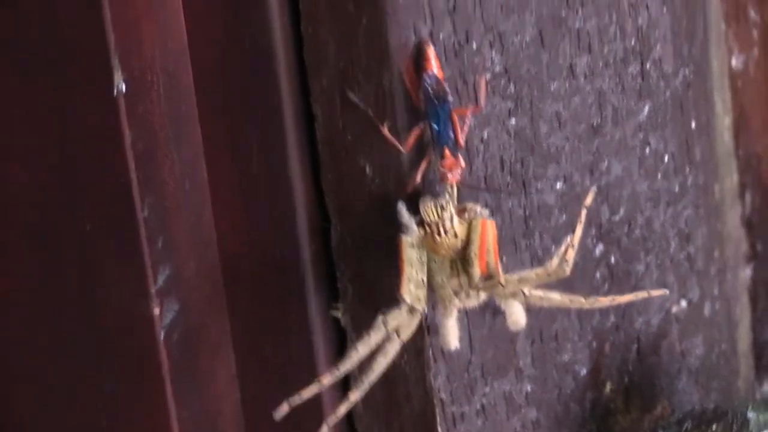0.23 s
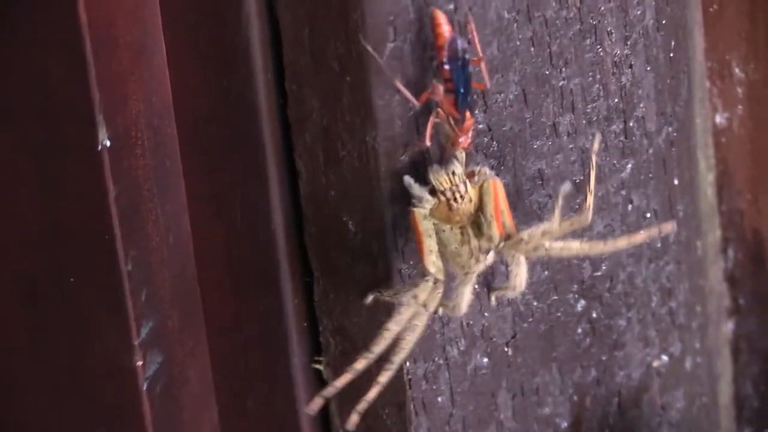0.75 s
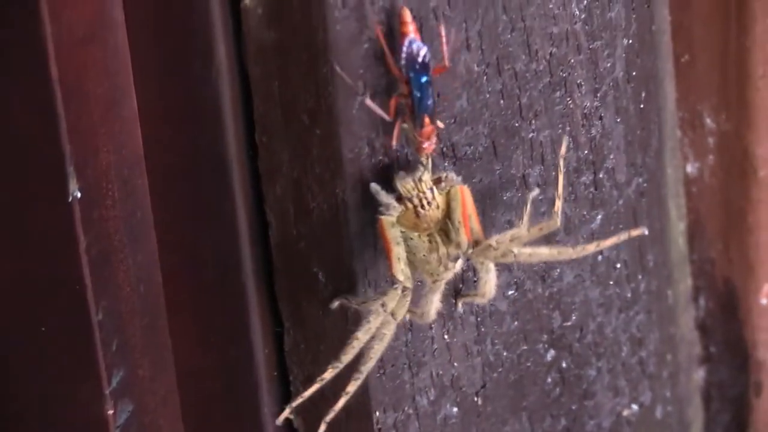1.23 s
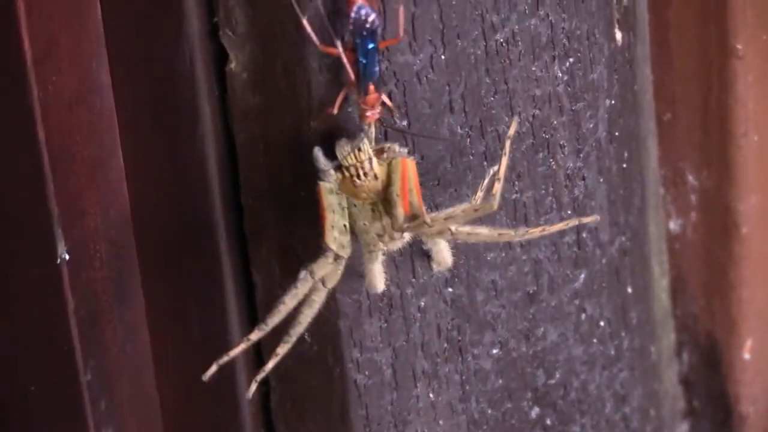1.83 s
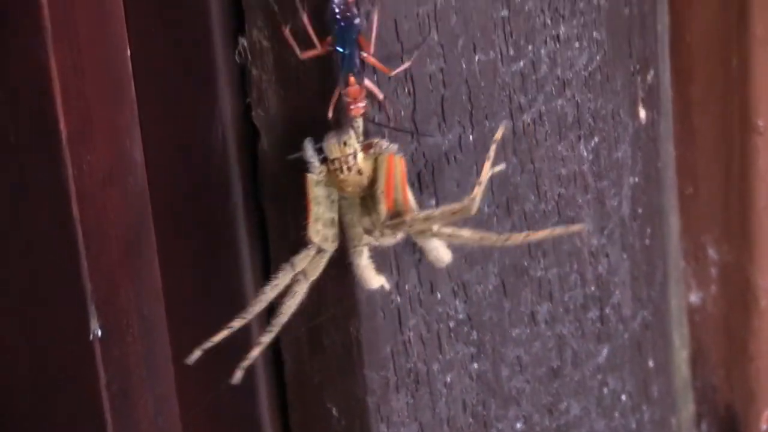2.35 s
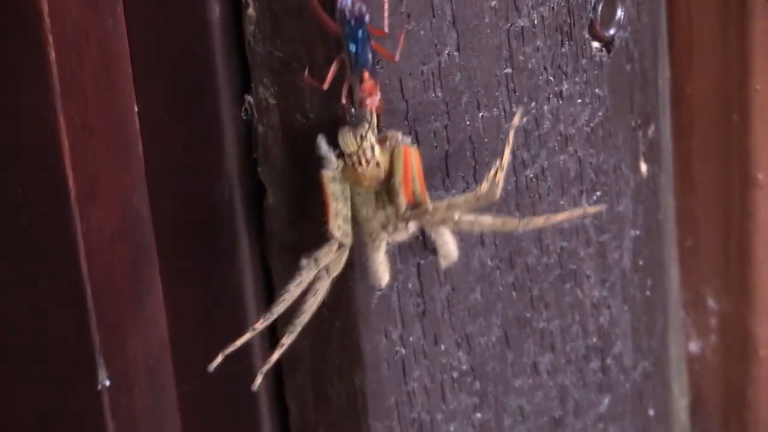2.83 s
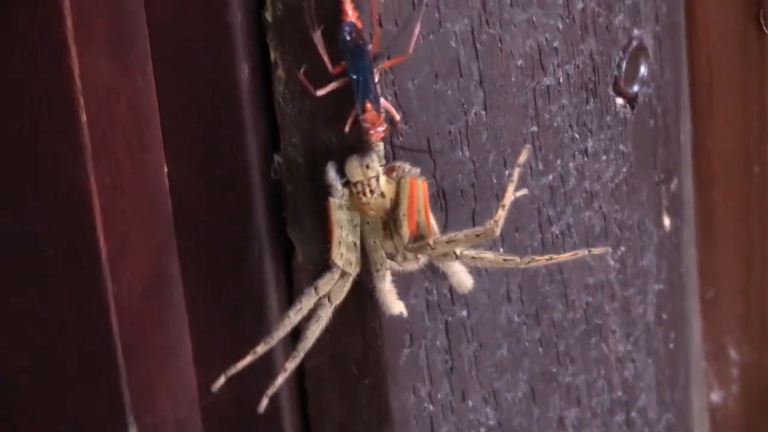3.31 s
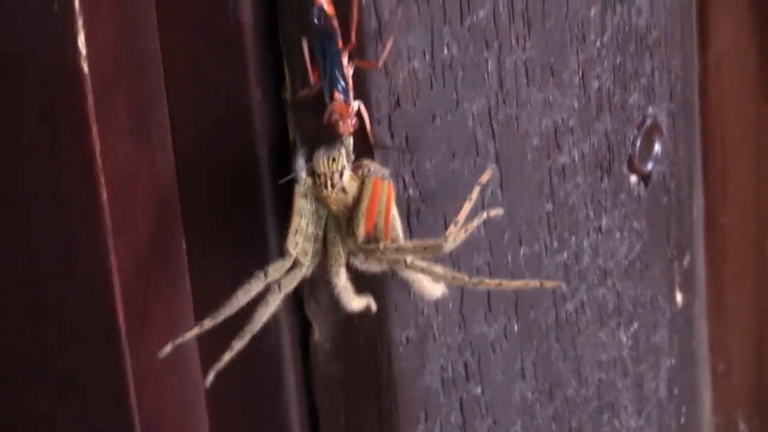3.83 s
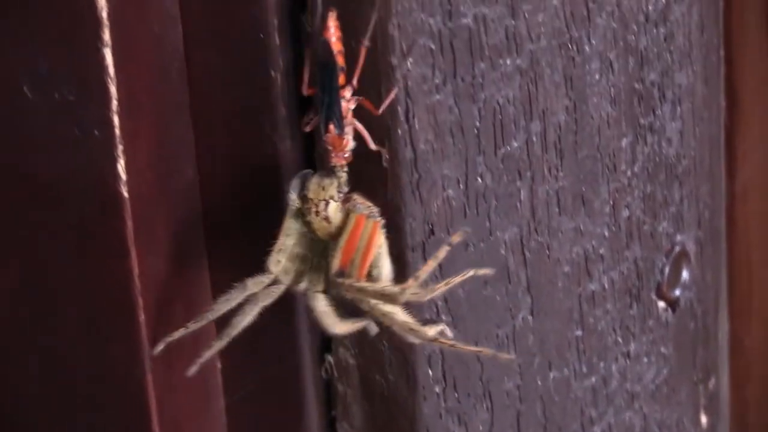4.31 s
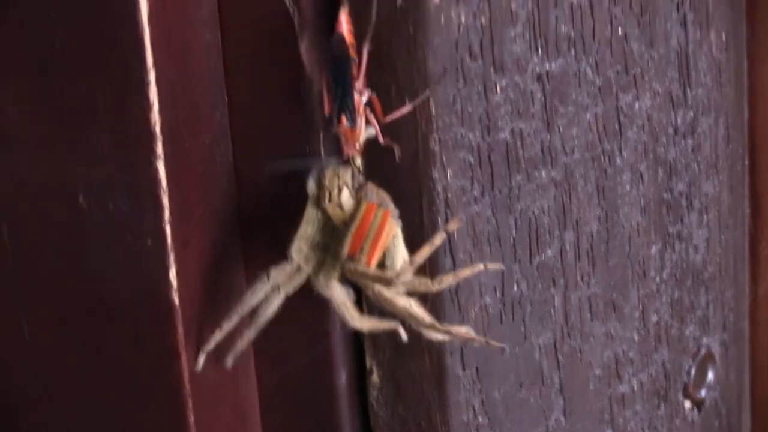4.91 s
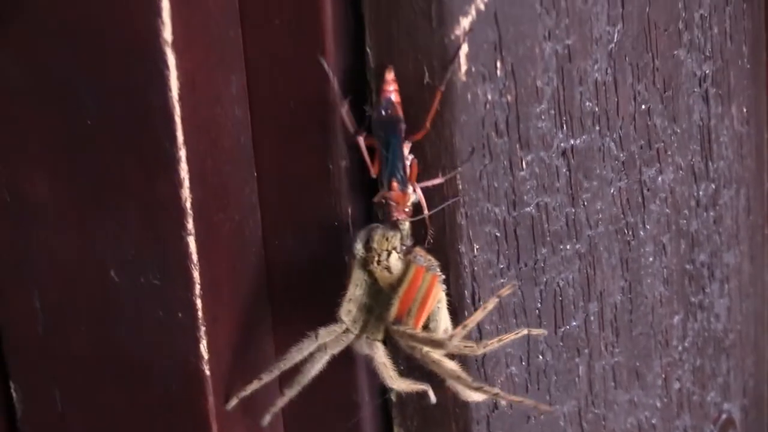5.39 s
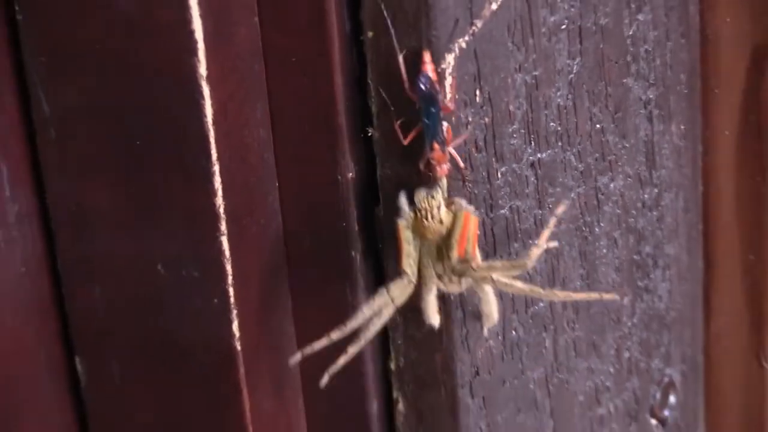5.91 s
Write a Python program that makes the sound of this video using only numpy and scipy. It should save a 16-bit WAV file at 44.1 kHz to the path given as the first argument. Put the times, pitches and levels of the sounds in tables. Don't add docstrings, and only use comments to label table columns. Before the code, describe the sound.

Humid forest ambience with shrill cricket trills, raspy bird calls, warbling whistles and quick chirps over a low distant engine throb and leaf hiss.

```python
import sys
import numpy as np
from scipy import signal
from scipy.io import wavfile
from scipy.ndimage import uniform_filter1d

SR = 44100
rng = np.random.default_rng(int(sys.argv[2]) if len(sys.argv) > 2 else 0)


def convert_level_to_amplitude(level_db):
    exponent = np.asarray(level_db, float) / 20
    return 10 ** exponent


def dump_mix(stems):
    frames = np.atleast_2d(stems).T
    limited = np.clip(frames, -1, 1)
    pcm = np.round(limited * 32767).astype(np.int16)
    wavfile.write(sys.argv[1], SR, pcm)


N = 271435


def evened(x):
    return x / np.sqrt(np.mean(x ** 2) + 1e-20)


def read(points, hz):
    point_hz, value = np.transpose(points)
    return np.interp(np.log(hz + 1), np.log(point_hz + 1), value)


def curves(rows, t):
    s, *columns = np.transpose(rows)
    return [np.interp(t, s, column) for column in columns]


def add(mix, s, sound):
    part = mix[round(s * SR):][:len(sound)]
    part += sound[:len(part)]


def resonate(x, hz, width):
    turn = np.exp(2j * np.pi * hz * np.arange(x.shape[-1]) / SR)
    r = np.exp(-np.pi * width / SR)
    return 2 * (turn * signal.lfilter([1 - r], [1, -r], x / turn)).real


def wander(hz, size=N):
    lowpass = signal.butter(2, hz, fs=SR, output="sos")
    return evened(signal.sosfilt(lowpass, rng.standard_normal(size + SR))[SR:])


def placed(x, side_db):
    return np.array([x * convert_level_to_amplitude(side_db / 2), x * convert_level_to_amplitude(-side_db / 2)])


# frequency in Hz, density in dB per Hz.
AIR = [(18, -57), (30, -52), (59, -23), (192, -3.5), (350, -15.5), (1140, -19.5), (2300, -23.5),
       (3690, -29.5), (5600, -30.5), (6550, -26.5), (7280, -16), (8290, -26), (8970, -37), (14000, -45.5),
       (15500, -43)]
# frequency in Hz, left-right likeness from -1 to 1.
SAME = [(60, 0.8), (150, 1), (380, 0.25), (950, -0.32), (2400, 0.5), (6000, -0.32), (9000, 0.79),
        (12000, 0.58), (15000, 0.32)]


def air():
    frames, hz = N // 256 + 5, np.fft.rfftfreq(1024, 1 / SR)
    a, b, c, d, patches = rng.standard_normal((frames, 513, 5)).T
    patches = evened(uniform_filter1d(uniform_filter1d(patches, 8, 0), 16, 1))
    same = np.clip(read(SAME, hz), -1, 1)[:, None]
    left, independent = a + 1j * b, c + 1j * d
    z = np.array([left, same * left + np.sqrt(1 - same ** 2) * independent])
    z *= convert_level_to_amplitude(read(AIR, hz)[:, None] + 1.4 * patches)
    noise = signal.istft(z, nperseg=1024, noverlap=768)[1][:, :N]
    return convert_level_to_amplitude(-51.5) * evened(noise)


# time in seconds, firing rate in Hz, level in dB.
ENGINE = [(0, 32.4, -49.5), (.15, 31.8, -51.5), (.55, 31.32, -49.5), (1.05, 29.98, -51.5),
          (1.5, 30.06, -53.5), (2, 29.27, -56), (2.3, 28.94, -52.5), (2.6, 28.33, -51.5), (3.1, 28.61, -46),
          (3.6, 28.89, -51), (4, 28.93, -47), (4.5, 29.58, -47), (5, 30.13, -46), (5.2, 30.25, -43),
          (5.35, 30.55, -43.5), (5.7, 30.77, -45.5), (6.15, 31.08, -44)]
# multiple of the firing rate, level in dB.
EXHAUST = [
    [(1, -60), (2, -38), (3, -9), (4, -2.5), (5, 0), (6, -1.5), (7, -17), (8, -17), (9, -28), (10, -24),
     (11, -23), (12, -28)],
    [(1, -60), (2, -35), (3, -6), (4, 1), (5, 1.5), (6, -1), (7, -5), (8, -9.5), (9, -23), (10, -32),
     (11, -25), (12, -36)],
    [(1, -60), (2, -39), (3, -29), (4, -16), (5, -11), (6, -1), (7, 0.5), (8, -20), (9, -14.5), (10, -18),
     (11, -38), (12, -39)],
    [(1, -60), (2, -39), (3, -27), (4, -15.5), (5, -6), (6, 1.5), (7, -3.5), (8, -24), (9, -17), (10, -8.5),
     (11, -25), (12, -37)],
    [(1, -60), (2, -42), (3, -24), (4, -19), (5, 0.5), (6, 0), (7, -7.5), (8, -10.5), (9, -15), (10, -12),
     (11, -18.5), (12, -19)],
]
EXHAUST_AT = [.55, 1.65, 3, 4.4, 5.7]


def engine(t):
    hz, db = curves(ENGINE, t)
    turns = np.cumsum(hz * (1 + .004 * wander(6.0))) / SR
    orders = np.zeros(N)
    for order in np.transpose(EXHAUST, (1, 0, 2))[:11]:
        multiple = order[0, 0]
        level_db = np.interp(t, EXHAUST_AT, order[:, 1]) + 2.0 * wander(2.8)
        smear = 0.2148 * multiple ** 2
        orders += convert_level_to_amplitude(level_db) * np.cos(2 * np.pi * multiple * turns + smear)
    orders /= np.sqrt(uniform_filter1d(orders ** 2, SR // 2))
    noise = rng.standard_normal(N)
    rumble = evened(resonate(resonate(noise, 140, 120), 195, 130))
    return convert_level_to_amplitude(db) * evened(orders + convert_level_to_amplitude(-14) * rumble)


def strokes(u):
    stroke_s, sounding_share = .014, .95
    part = (u % stroke_s) / (stroke_s * sounding_share)
    return np.sin(np.pi * np.clip(part, 0, 1)) * (u >= 0) * (u < 3 * stroke_s)


# centre in Hz, spread in Hz, number of singers.
CHOIRS = [
    (7240, 105, 45),
    (7620, 5, 2),
    (7830, 10, 3),
    (7750, 300, 20),
]
CHOIR_DB = [-55.3, -64.5, -67, -65.5]


def choirs(t):
    out = np.zeros((2, N))
    for (hz, spread, singers), db in zip(CHOIRS, CHOIR_DB):
        choir = np.zeros((2, N))
        for tune, pace, start, side, far in np.clip(rng.standard_normal((int(singers), 5)), -2, 2):
            u = (t + 3 + start) % (.1 * (1 + .12 * pace))
            song = strokes(u) * np.cos(2 * np.pi * (hz + spread * tune) * t)
            choir += convert_level_to_amplitude(3.0 * far) * placed(song, 6.0 * side)
        out += convert_level_to_amplitude(db) * evened(choir)
    return out


# start in seconds, length in seconds, effort in dB, beak opening 0-1.
RASPS = [(-.3, 0.33, -43, 0.9), (0.081, 0.089, -46.5, 0.9), (0.25, 0.16, -50.5, 0.8),
         (0.615, 0.11, -55, .1), (0.798, 0.23, -59, 0), (1.055, 0.098, -52.5, 0), (1.233, 0.36, -60, 0),
         (1.507, 0.31, -46.5, 0.56), (1.6, 0.28, -47, 0.79), (1.85, 0.13, -46, .45),
         (2.138, 0.14, -51, 0.4), (2.22, 0.14, -51, 0.76), (2.77, 0.34, -61, 0.15),
         (3.494, 0.29, -46.5, 0.91), (3.75, 0.28, -51, 0.88), (4.02, 0.38, -54.5, 0.67),
         (4.562, 0.62, -48, 0.59), (5.462, 0.16, -53, 0.07), (5.674, 0.17, -51, 0)]
# dB shut, dB open, lag in seconds,
# sag in dB over a call.
RASP_PARTS = [(1.5, -7, 0.0024, -6.5), (-1.5, 1, 0.001, -6), (-22.5, 1.5, 0.052, -5.5)]


def rasp_gains(t):
    s, length, db, opening = np.transpose(RASPS)[..., None]
    rise_s, fall_s = 0.015, 0.049
    gains = []
    for shut_db, open_db, lag, sag_db in RASP_PARTS:
        rise = np.clip((t - s - abs(lag)) / (rise_s + .4 * abs(lag)), 0, 1) ** 2
        fall = np.exp(-np.maximum(t - s - length, 0) / fall_s)
        sag = sag_db * np.clip((t - s) / length, 0, 1)
        gains.append(rise * fall * convert_level_to_amplitude(db + shut_db + (open_db - shut_db) * opening + sag))
    return gains


# start in seconds, length in seconds, level in dB.
CROAKS = [(-.1, 0.91, -54.5), (.58, 0.23, -53.5), (1.0, 0.74, -59.5), (1.45, 0.57, -57.5),
          (2.034, 0.43, -53), (3.455, 0.73, -51.5), (3.95, .65, -56), (4.5, .2, -55.5),
          (4.647, 0.76, -58.5), (5.452, 0.31, -52.5), (5.67, 0.24, -48.5), (5.851, 0.38, -57)]


def croak_gain(t):
    s, length, db = np.transpose(CROAKS)[..., None]
    return convert_level_to_amplitude(db) * abs(np.sin(np.pi * np.clip((t - s) / length, 0, 1))) ** 0.69


# frequency in Hz, width in Hz, level in dB.
LOWER = [(2850, 600, 0), (3250, 800, 0)]
MIDDLE = [(3550, 250, -5), (3850, 350, -1), (4150, 900, -2), (4500, 300, -1), (4750, 350, -4)]
UPPER = [(5000, 350, -2), (5350, 350, -2), (5400, 1100, -2)]
CHEST = [(542, 450, -4), (1020, 340, -3), (1647, 330, -1.5)]


def rasps(t):
    turns = np.cumsum(135 * (1 + 0.15 * wander(30.0))) / SR
    gate = 1.0 + np.exp(-(turns % 1) / 1.9)
    coarse = t[::32]
    murmur_db = -71.5
    out = np.zeros(N)
    for throat, gains in zip((LOWER, MIDDLE, UPPER, CHEST), rasp_gains(coarse) + [croak_gain(coarse)]):
        level_db = 10 * np.log10((gains ** 2).sum(0) + convert_level_to_amplitude(murmur_db) ** 2)
        level_db = np.repeat(level_db, 32)[:N]
        shaped = np.zeros(N)
        for hz, width, db in throat:
            breath = gate * rng.standard_normal(N)
            voiced = evened(resonate(resonate(breath, hz, width), hz, width))
            shaped += convert_level_to_amplitude(db + 2.0 * wander(10.6)) * voiced
        out += convert_level_to_amplitude(level_db + 1.4 * wander(17.3)) * evened(shaped)
    return out


def note(rows, overtones, warble=0., loudest=0., shake=0.012, grain_db=2.0, edge_s=0.00089, grain_hz=60):
    t = np.arange(rows[0][0], rows[-1][0], 1 / SR)
    hz, db = curves(rows, t)
    warble_hz, depth, lead = 17.5, .03, 1.1
    beat = 2 * np.pi * warble_hz * (t - loudest) + .5 * wander(8.8, len(t))
    fall = np.cos(beat + lead) + 0.13 * np.cos(2 * beat + lead)
    bend = depth * warble * fall + shake * wander(165, len(t))
    turns = np.cumsum(hz * (1 + bend)) / SR
    tone = sum(convert_level_to_amplitude(k_db) * np.cos(2 * np.pi * k * turns) for k, k_db in overtones)
    grain = convert_level_to_amplitude(grain_db * wander(grain_hz, len(t)))
    edge = np.clip(np.minimum(t - t[0], t[-1] - t) / edge_s, 0, 1)
    pulse = 1 + .5 * np.cos(beat) * np.sqrt(abs(warble))
    return t[0], np.sqrt(2) * convert_level_to_amplitude(db) * pulse * grain * edge * tone


def whistle(s, length, hz, db, swell):
    end, drop_s, sag_db = s + length, 0.069, -1.5
    return [(s, hz * (1 - 0.0199), db - 12.5),
            (s + swell, hz, db),
            (end - min(drop_s, length / 2), hz, db + sag_db),
            (end, hz * (1 - 0.0706), db + sag_db - 8.5)]


# start in seconds, length in seconds, pitch in Hz, level in dB, swell in seconds.
WHISTLES = [
    (0, 0.055, 1320, -50, 0.0017),
    (.11, 0.59, 1338, -51, 0.096),
    (1.298, .52, 1312, -53.5, 0.379),
    (1.885, 0.55, 1328, -50, 0.05),
]
# depth 0-1, loudest moment in seconds.
WARBLES = [(.2, .02), (.65, .39), (.25, 1.77), (.9, 2.197)]


def whistler():
    out = np.zeros(N)
    for row, warble in zip(WHISTLES, WARBLES):
        add(out, *note(whistle(*row), [(1, 0)], *warble, shake=.008, grain_db=3.5, grain_hz=35))
    return out


def cricket(bouts, every_s, hz):
    out, u = np.zeros(N), np.arange(0, .05, 1 / SR)
    for start, chirps, db in bouts:
        for k in range(round(chirps)):
            bend, turn, push = rng.random(3)
            wing = np.cos(2 * np.pi * (hz * (1 + .004 * (bend - .5)) * u + turn))
            level_db = db + 4.0 - 2 * (push - 1.0)
            add(out, max(start + k * every_s - .0015, 0), convert_level_to_amplitude(level_db) * strokes(u) * wing)
    return out


# start in seconds, number of chirps, level in dB.
NEIGHBOUR = [
    (0, 1, -55.5),
    (.09, 2, -53),
    (.283, 1, -56),
    (.452, 2, -55.5),
    (.646, 1, -54),
    (.777, 3, -55),
    (1.095, 1, -56),
    (1.283, 6, -58),
    (2.197, 3, -59),
    (2.605, 3, -67),
]


def neighbour_cricket():
    return cricket(NEIGHBOUR, .105, 8230)


# start in seconds, number of chirps, level in dB.
CRICKET = [(.008, 1, -60), (.096, 2, -57), (.26, 1, -59), (.412, 3, -54.5), (.998, 1, -57),
           (1.126, 2, -52.5), (1.34, 2, -54), (1.564, 6, -52.5), (2.188, 5, -55), (2.712, 4, -56.5),
           (3.127, 8, -54.5), (3.972, 2, -53.5), (4.192, 4, -51.5), (4.721, 3, -52.5), (5.039, 2, -52),
           (5.27, 8, -54.5), (6.111, 1, -57)]


def near_cricket():
    return cricket(CRICKET, .1071, 8060)


# start in seconds, length in seconds, centre in Hz, width in Hz, level in dB.
CLUCKS = [(0.254, 0.018, 2100, 496, -56), (0.623, 0.034, 1950, 800, -47), (1.058, 0.026, 2030, 503, -47),
          (3.499, 0.025, 2000, 600.3, -54), (3.899, 0.012, 1900, 1500, -61),
          (4.132, 0.023, 2500, 700, -49.5), (5.956, .015, 2103, 1200, -58), (4.257, 0.04, 2480, 500, -48.5),
          (5.482, 0.088, 3680, 300, -54), (5.538, 0.1, 2920, 350, -57), (5.589, 0.055, 3697, 450, -51.5),
          (5.682, 0.11, 3696, 380, -50.5), (5.791, 0.064, 3780, 450, -52), (5.719, 0.086, 2960, 350, -56)]


def clucks():
    out = np.zeros(N)
    for s, length, hz, width, db in CLUCKS:
        burst = rng.standard_normal(SR // 10)[:round(length * SR)]
        throat = evened(resonate(resonate(burst, hz, width), hz, width))
        add(out, s, convert_level_to_amplitude(db) * throat * np.hanning(len(burst)))
    return out


def glide(s, length, from_hz, to_hz, db, bend, fade_db):
    u = np.linspace(0, 1, num=9)
    return np.transpose([s + length * u, to_hz + (from_hz - to_hz) * (1 - u) ** bend, db + fade_db * u])


# start in seconds, length in seconds, from Hz, to Hz,
# level in dB.
SLIDES = [(0.29, 0.07, 2127, 1630, -53), (0.658, 0.12, 2200, 1539, -50.5), (1.081, 0.13, 2201, 1559, -48.5),
          (1.538, .12, 2171, 1543, -50.5), (4.168, 0.064, 2014, 1526, -50),
          (4.585, 0.031, 1674, 1654, -55.5), (4.622, 0.039, 1735, 2094, -51.5),
          (4.69, .09, 2004, 1593, -53), (4.844, 0.063, 1650, 1686, -56), (4.902, .13, 1664, 1655, -64),
          (4.341, 0.036, 1557, 1555, -57.5)]
# delay in seconds, level in dB.
TRUNKS = [(.022, -7.5), (.068, -8.5)]


def slider():
    out = clucks()
    for row in SLIDES:
        rows = glide(*row, bend=1.3, fade_db=-4.5)
        add(out, *note(rows, [(1, 0), (.5, -15)], shake=.02, grain_db=3.5, grain_hz=110, edge_s=.006))
        for delay, db in TRUNKS:
            s, again = note(rows, [(1, db), (.5, db - 14)], shake=.035, grain_db=4, grain_hz=130, edge_s=.008)
            add(out, s + delay, again)
    return out


def chirp(s, length, low_hz, db, hook):
    u, dip = np.linspace(0, 1, num=9), 0.35
    early = np.maximum(1 - u / dip, 0) ** 2
    late = (np.maximum(u - dip, 0) / (1 - dip)) ** 2
    hz = low_hz * (1 + 0.024 * early + min(hook, .14) * late)
    return np.transpose([s + length * u, hz, db - 2.5 * early + 0.5 * late])


# start in seconds, length in seconds, lowest Hz, level in dB, hook as a share.
CHIRPS = [(0.387, 0.03, 2230, -45.5, 0.066), (0.423, 0.027, 2255, -52.5, .01),
          (0.777, 0.031, 2266, -45, 0.089), (0.811, 0.022, 2167, -42, 0.019),
          (1.214, 0.032, 2210, -44, 0.072), (1.247, 0.023, 2148, -42, .01),
          (1.673, 0.0317, 2150, -45, 0.046), (4.269, 0.043, 2130, -48.5, .14),
          (4.308, 0.0066, 2150, -49, .01), (4.38, 0.032, 2165, -51, 0.091),
          (4.798, 0.041, 2190, -49, 0.049)]
# start in seconds, length in seconds, from Hz, to Hz, level in dB.
SWOOPS = [
    (3.942, .08, 2950, 2790, -51),
    (1.76, .035, 1760, 2090, -54.5),
    (4.952, .03, 1765, 2060, -55),
    (4.132, .028, 1827, 2080, -54.5),
    (4.259, 0.014, 2700, 2200, -52),
    (.419, .05, 3090, 2900, -57),
    (.807, .045, 3110, 2780, -59.5),
    (6.005, 0.047, 2705, 2560, -54),
]
# start in seconds, length in seconds, pitch in Hz, level in dB.
PIPS = [(.628, .02, 3720, -61), (1.04, .04, 3450, -59), (1.245, .06, 2920, -54), (1.245, .05, 5820, -66),
        (1.5, .12, 3800, -61), (2.88, .33, 3800, -68), (2.9, .25, 4800, -73), (4.28, .06, 4300, -60),
        (5.47, .03, 850, -63), (6.13, .03, 3870, -59), (4.89, .04, 1120, -63), (3.91, .02, 3220, -62),
        (4.7, .03, 2980, -60)]


def chirper():
    out = np.zeros(N)
    swoops = [glide(*row, bend=2.27, fade_db=-2) for row in SWOOPS]
    for rows in [chirp(*row) for row in CHIRPS] + swoops:
        octave_db = -10.5 if rows[0][0] < 1.5 else -28
        add(out, *note(rows, [(1, 4.4), (2, octave_db)]))
    for s, length, hz, db in PIPS:
        add(out, *note([(s, hz, db), (s + length, hz, db - 3.0)], [(1, 0)], shake=.02))
    return out


# time in seconds, level in dB.
SNAPS = [
    (4.4872, -22.5),
    (4.4897, -29.5),
]
# frequency in Hz, level in dB, t60 in seconds.
TWIG = [(2270, 3.5, 0.0042), (3430, -18, 0.012), (1300, -15, 0.0083), (8800, -14, 0.0027),
        (5400, -20, 0.0032), (10500, -19, 0.0023)]


def twig():
    u, out = np.arange(0, .03, 1 / SR), np.zeros(N)
    ring = sum(convert_level_to_amplitude(db - 60 * u / t60) * np.sin(2 * np.pi * hz * u) for hz, db, t60 in TWIG)
    onset = 1 - np.exp(-(u / .0008) ** 2)
    for s, db in SNAPS:
        add(out, s, convert_level_to_amplitude(db + 12) * ring * onset)
    return out


# frequency in Hz, t60 in seconds.
FOREST = [(800, 0.61), (2200, 1), (4500, 0.71), (8000, 0.49)]


def forest(x):
    taps = np.zeros((2, SR))
    at = np.arange(300, SR - 20, 20) + rng.integers(0, 20, (2, (SR - 301) // 20))
    np.put_along_axis(taps, at, rng.choice([-1., 1.], at.shape), 1)
    taps *= np.clip(np.arange(SR) / SR / .02, .2, 1)
    hz, t, z = signal.stft(taps, SR, nperseg=256)
    decay = convert_level_to_amplitude(-60 * t / read(FOREST, hz)[:, None])
    tail = signal.istft(z * decay, SR, nperseg=256)[1]
    return signal.fftconvolve(x[None], tail / np.linalg.norm(tail[0]), axes=1)[:, :N]


# time in seconds, left-right level in dB.
CRICKET_SIDE = [
    (0, -10),
    (1.9, -2),
    (2.4, -13),
    (4.2, -6),
    (4.7, 7),
    (5.6, 10.5),
    (6.15, 0),
]


def scene():
    t = np.arange(N) / SR
    far, whistles = convert_level_to_amplitude(-5.5) * rasps(t), whistler()
    other, near = neighbour_cricket(), near_cricket()
    slides, chirps, snap = slider(), chirper(), twig()
    direct = placed(far, -0.55) + placed(convert_level_to_amplitude(-2.5) * whistles, -1.8)
    direct += placed(other, -1.5) + placed(near, *curves(CRICKET_SIDE, t))
    direct += placed(slides, -7.0) + placed(chirps, -3.5) + placed(snap, .3)
    wet = far + convert_level_to_amplitude(-4.5) * whistles + .85 * (near + other)
    wet += 0.82 * slides + .47 * chirps + convert_level_to_amplitude(-12.0) * snap
    return direct + forest(wet) + choirs(t) + engine(t) + air()


def low_pass(x):
    return signal.sosfilt(signal.butter(12, 15680, fs=SR, output="sos"), x)


def record(dry):
    heard = signal.lfilter(*signal.butter(1, 55, "high", fs=SR), dry)
    return low_pass(heard)


dry = scene()
out = record(dry)
dump_mix(out)
```